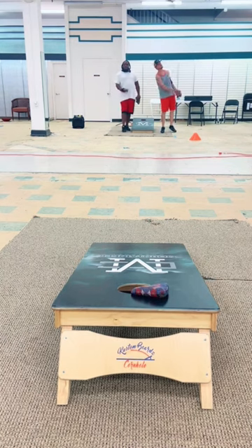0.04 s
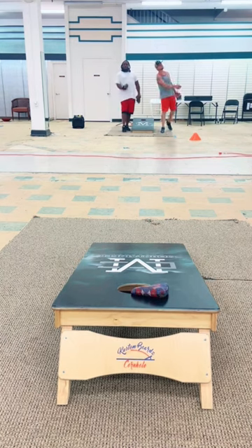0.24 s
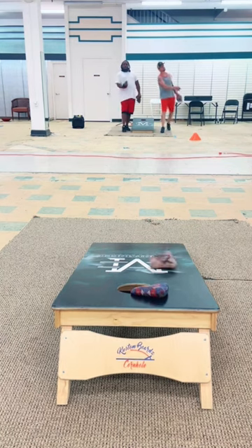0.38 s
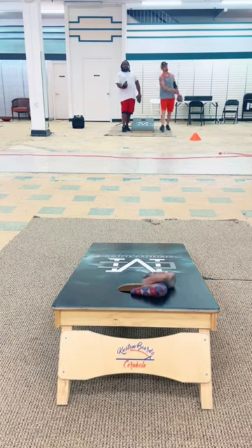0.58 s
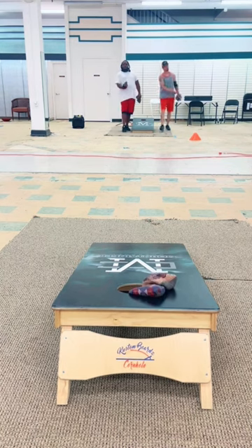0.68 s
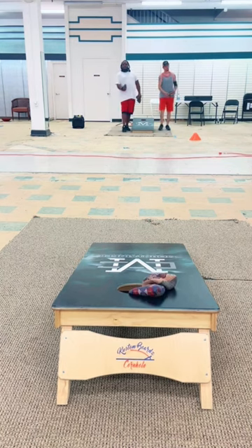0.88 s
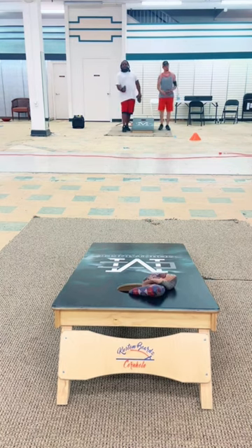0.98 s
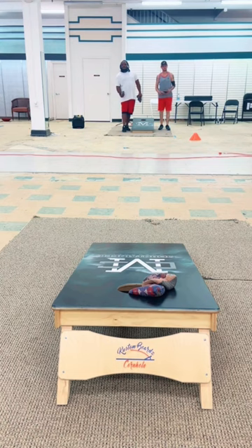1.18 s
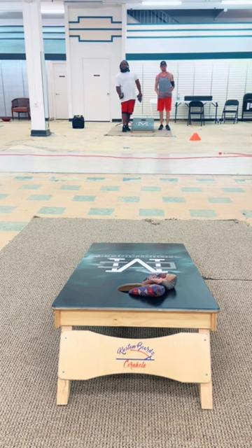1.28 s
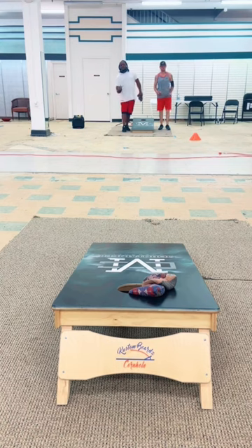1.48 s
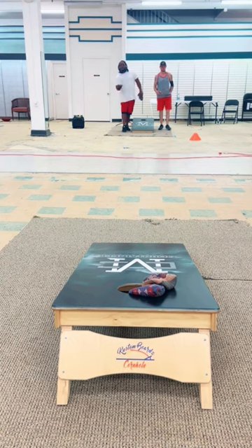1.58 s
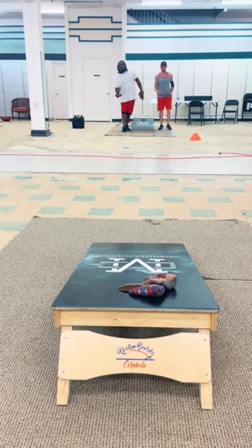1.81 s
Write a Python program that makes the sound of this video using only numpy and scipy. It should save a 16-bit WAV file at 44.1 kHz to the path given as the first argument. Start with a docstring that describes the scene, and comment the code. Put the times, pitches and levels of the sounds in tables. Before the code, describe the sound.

A beanbag lands on a wooden board, heard close up in a large hard hall. Faint ventilation and a tiny treble rustle lead in; at about 0.22 seconds a crunchy pellet slap and a hollow, quickly damped woody thud strike together. Dull wall echoes and a slightly uneven, boomy reverberation follow, fading slowly to the end, with barely audible rustles around 1.4 to 1.8 seconds.

```python
"""A faint treble rustle comes first, then a beanbag slaps a wooden board in a large hard hall.
The pellets are dense random clicks under a fast envelope; the board is a bank of swelling, decaying sines.
The hall answers with dulled wall echoes, a long tail of patchy filtered noise and a few low standing
waves as slow sines. More faint rustles of enveloped noise follow, over steady coloured ventilation noise."""
import sys
import numpy as np
from scipy import signal
from scipy.fft import rfft, irfft
from scipy.io import wavfile
from scipy.ndimage import uniform_filter1d

SR = 44100
rng = np.random.default_rng(int(sys.argv[2]) if len(sys.argv) > 2 else 0)


def inscribe(sig):
    """Save sig as 16-bit PCM at rate SR to the path in sys.argv[1].

    A 1-D sig is mono; a 2-D sig holds one channel per row.
    Samples are clipped to [-1, 1] before scaling.
    """
    pcm = np.round(np.clip(np.atleast_2d(sig).T, -1, 1) * 32767)
    wavfile.write(sys.argv[1], SR, pcm.astype(np.int16))


def ratio(d):
    """dB to gain"""
    e = np.asarray(d, float) / 20
    return 10 ** e


N = 81585  # samples, 1.85 s

# Board modes, swelling as the soft bag presses for some ms:
# pitch_hz, level_db (before swell and decay), t60_s, swell_s
BOARD_MODES = [(62.2, -27, 0.32, 0.025), (106.4, -17.5, .1, 0.015), (144.8, -5, .11, 0.011),
               (229.4, -0.5, 0.1, .013), (316.5, 5, 0.097, 0.017), (427.7, -3, 0.079, 0.0072),
               (510.3, -10.5, 0.13, 0.01), (595, -9.5, 0.094, 0.0077), (662, -17.5, .07, 0.0041),
               (757, -15.5, 0.13, 0.009), (865, -29.5, 0.12, .005), (1007.6, -16, 0.068, 0.0088),
               (1201, -27.5, 0.12, 0.008), (1327.4, -33.5, 0.11, 0.0034), (1540, -23, .04, 0.002),
               (1803, -28.5, 0.027, .003), (2120, -37.5, .04, 0.0034), (2397, -23.5, .045, .004),
               (3141, -19.5, 0.02, 0.0074)]
# Colour of the pellet crash: pitch_hz, relative level_db (per Hz)
SLAP_SPECTRUM = [(300, -28.5), (600, -9), (900, -9.5), (1600, -10), (2000, -12.5), (2900, -14.5),
                 (3250, -4.5), (3700, -21), (5000, -22), (6200, -18), (7000, -21.5), (7800, -16),
                 (9000, -22.5), (10100, -35.5), (11000, -61)]
# Near walls: delay_s, level_db
WALL_ECHOES = [(.07, -27.5), (0.113, -28.5), (.172, -23)]
# Colour of the tail, smoother than the direct sound because the hall gathers the blow from all sides:
# pitch_hz, relative level_db (per Hz)
HALL_SPECTRUM = [(18, -69), (30, -34), (49, -22.5), (92, -21), (125, -12), (150, -10.5), (173, -10.5),
                 (226, -2.5), (269, -8.5), (326, 1), (378, -12), (437, -7), (530, -12), (640, -17),
                 (760, -20.5), (880, -24.5), (1050, -25.5), (1400, -30.5), (1800, -32.5), (2300, -33.5),
                 (2800, -36.5), (3500, -34), (4300, -41), (5600, -40.5), (6400, -44), (7200, -47.5),
                 (8500, -48), (9300, -54.5), (9600, -88.5), (22000, -120)]
# Tail decay across the spectrum: pitch_hz, t60_s
HALL_DECAY = [(60, 2.2), (120, 1.7), (200, 1.8), (320, 2.31), (500, 2.43), (800, 2.7), (1300, 2.3),
              (2100, 2.25), (3200, 1.85), (4600, 1.6), (6300, 1.5), (9000, 1.1)]
# Air resonances between walls: pitch_hz, level_db (before build-up and decay), t60_s, build_s
STANDING_WAVES = [(143.4, -26, 2.81, 0.091), (136.6, -35.5, 1.7, .1), (335, -32, 2.8, .06),
                  (303.6, -36.5, 3.1, .1)]
# Faint treble rustles, likely pellets shifting in bags: start_s, length_s, level_db (at the crest)
RUSTLE_TIMES = [(.13, 0.19, -75.5), (0.1905, 0.0046, -71), (1.42, .17, -82), (1.642, 0.055, -88),
                (1.722, 0.1, -88.5)]
# Colour of the rustles: pitch_hz, relative level_db (per Hz)
RUSTLE_SPECTRUM = [(1470, -30), (2500, -6), (2730, -2.5), (7700, -2.5), (9220, -3), (10000, -19),
                   (13000, -60), (22000, -120)]
# Colour of the ventilation noise: pitch_hz, relative level_db (per Hz)
AIR_SPECTRUM = [(15, -46.5), (25, -13), (40, -6.5), (75, 6.5), (120, -1.5), (246, -7.5), (293, -13.5),
                (500, -17), (930, -25), (2180, -32.5), (2950, -41.5), (3900, -38), (5000, -46),
                (9000, -47.5), (9600, -57), (22000, -120)]

LEAD_IN_S, SLAP_S, THUD_S = 0.206, 0.2155, 0.2160  # faint noise ramp, pellet crash, board ring


def evened(x):
    """Scales a signal to rms 1."""
    return x / np.sqrt(np.mean(x ** 2) + 1e-20)


def read_curve(points_hz, values, hz):
    """Reads a curve as straight lines on a log-frequency axis."""
    return np.interp(np.log(hz + 1), np.log(np.asarray(points_hz) + 1), values)


def coloured(x, spectrum):
    """Filters a signal to a spectrum table and scales it to rms 1."""
    points_hz, level_db = np.transpose(spectrum)
    hz = np.fft.rfftfreq(len(x), 1 / SR)
    gain = ratio(read_curve(points_hz, level_db, hz))
    return evened(irfft(rfft(x) * gain, len(x)))


def board():
    """Modes swell under the pressing bag and ring out; neighbours move in opposite sense where it lands."""
    t = np.maximum(np.arange(N) / SR - THUD_S, 0)
    ring = np.zeros(N)
    for k, (pitch_hz, level_db, t60_s, swell_s) in enumerate(BOARD_MODES):
        swell = 1 - np.exp(-(t / swell_s) ** 2)
        decay = ratio(level_db - 60 * t / t60_s)
        ring += (-1) ** k * decay * swell * np.sin(2 * np.pi * pitch_hz * t)
    return ring


def grains():
    """Pellets knock at random moments, giving dense clicks of uneven size and sign."""
    grains_per_s, spread_db = 8300, 2.5
    struck = rng.random(N) < grains_per_s / SR
    size = ratio(spread_db * np.minimum(rng.exponential(1, N), 4))
    return struck * size * rng.standard_normal(N)


def slap():
    """Pellets crash against the cloth and the board, then keep shifting as they settle."""
    level_db, rise_s, hold_s, t60_s = -23, 0.0011, 0.0058, 0.025
    settle_db, settle_t60_s = -9, 0.19  # relative to the crash
    lead_in_db = -25  # relative to the crash

    now = np.arange(N) / SR
    t = np.maximum(now - SLAP_S, 0)
    after = np.maximum(t - rise_s - hold_s, 0)
    fade = ratio(-60 * after / t60_s) + ratio(settle_db - 60 * after / settle_t60_s)
    # A faint noise ramp in the slap's colour leads into the crash
    lead_in = ratio(lead_in_db) * np.clip((now - LEAD_IN_S) / (SLAP_S - LEAD_IN_S), 0, 1)
    attack = np.minimum(lead_in + t / rise_s, 1)
    return ratio(level_db) * attack * fade * coloured(grains(), SLAP_SPECTRUM)


def echoes(blow):
    """The nearest walls each send back one delayed return, duller than the blow."""
    lowpass = signal.butter(2, 2500, fs=SR, output="sos")  # Hz
    dull = signal.sosfilt(lowpass, blow)
    return sum(ratio(level_db) * np.roll(dull, round(delay_s * SR)) for delay_s, level_db in WALL_ECHOES)


def hall():
    """Dense reflections fade in just after the slap, come in uneven clumps and die band by band."""
    level_db, patchy_db = -27.5, 1.28
    gap_s, full_s = 0.015, 0.47  # wait and fade-in time; clock time until which the level holds

    noise = coloured(rng.standard_normal(N), HALL_SPECTRUM)
    hz, t, cells = signal.stft(noise, SR, nperseg=512, noverlap=384)
    # Smoothing over neighbouring bands and moments leaves clumps
    patches = uniform_filter1d(rng.standard_normal(cells.shape), size=4, axis=0)
    patches = evened(uniform_filter1d(patches, size=14, axis=1))
    t60_s = read_curve(*np.transpose(HALL_DECAY), hz)[:, None]
    decay_db = -60 * np.maximum(t - full_s, 0) / t60_s
    cells = cells * ratio(decay_db + patchy_db * patches)
    tail = signal.istft(cells, SR, nperseg=512, noverlap=384)[1][:N]
    late = np.arange(N) / SR - SLAP_S - gap_s
    return ratio(level_db) * np.clip(late / gap_s, 0, 1) * tail


def standing():
    """Low air resonances between the walls swell after the blow and die slowly."""
    t = np.maximum(np.arange(N) / SR - SLAP_S, 0)
    waves = np.zeros(N)
    for pitch_hz, level_db, t60_s, build_s in STANDING_WAVES:
        build = 1 - np.exp(-(t / build_s) ** 2)
        decay = ratio(level_db - 60 * t / t60_s)
        waves += decay * build * np.sin(2 * np.pi * (pitch_hz * t + rng.random()))
    return waves


def rustles():
    """Fine treble grain swells and sinks in half-sine arcs, likely pellets shifting in bags."""
    t = np.arange(N) / SR
    swell = np.zeros(N)
    for start_s, length_s, level_db in RUSTLE_TIMES:
        swell += ratio(level_db) * np.sin(np.pi * np.clip((t - start_s) / length_s, 0, 1))
    return swell * coloured(rng.standard_normal(N), RUSTLE_SPECTRUM)


def ventilation():
    """Moving air makes a faint steady noise, strongest in the lows."""
    return ratio(-59.5) * coloured(rng.standard_normal(N), AIR_SPECTRUM)


def scene():
    """Mixes the blow, the hall's answer, the rustles and the background air into one channel."""
    blow = board() + slap()
    answer = echoes(blow) + hall() + standing()
    return (blow + answer + rustles() + ventilation())[None]


def roll_off(x):
    """The treble ends steeply here."""
    return signal.sosfilt(signal.butter(12, 10260, fs=SR, output="sos"), x)


def record(dry):
    """Rolls off the treble above 10 kHz with a steep linear-phase filter and returns the finished mix."""
    lowpass = signal.firwin(255, 10000, window=("kaiser", 9), fs=SR)
    limited = signal.oaconvolve(dry, lowpass[None], "same")
    return roll_off(limited)


dry = scene()
out = record(dry)
inscribe(out)
```